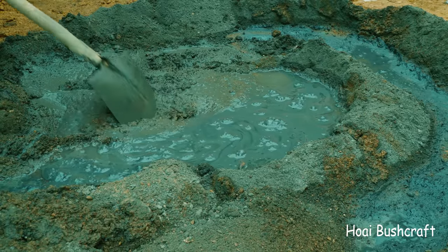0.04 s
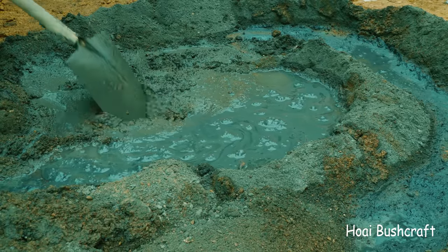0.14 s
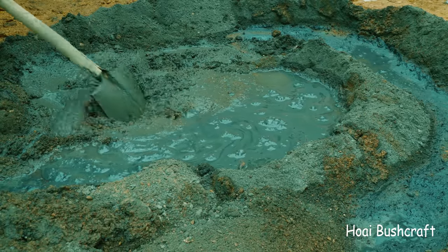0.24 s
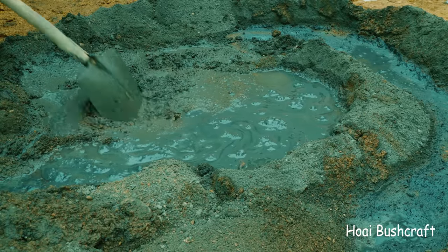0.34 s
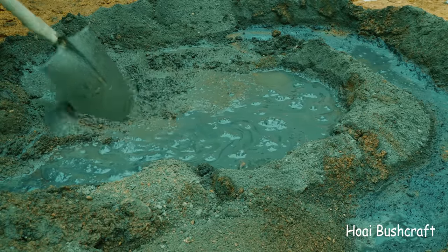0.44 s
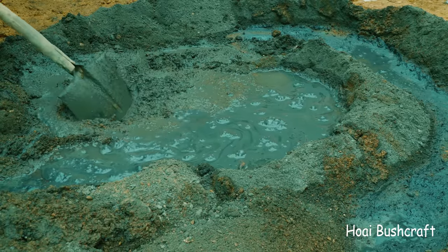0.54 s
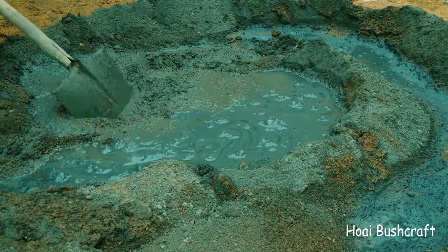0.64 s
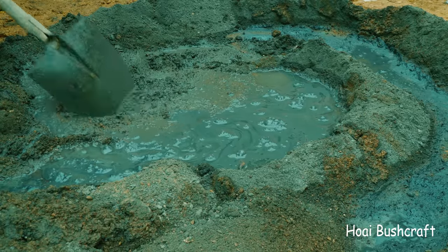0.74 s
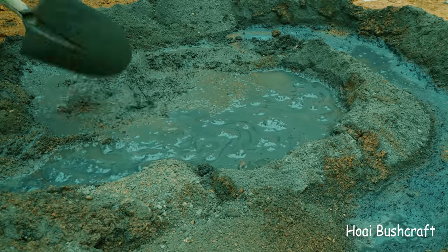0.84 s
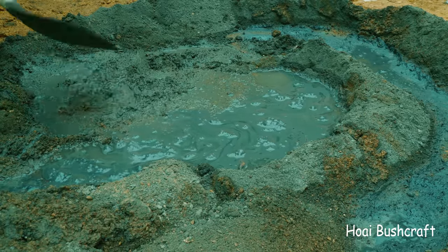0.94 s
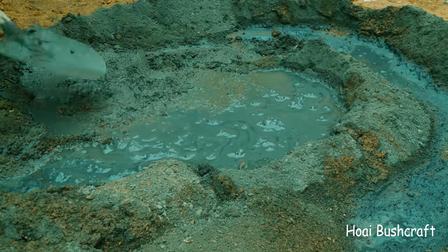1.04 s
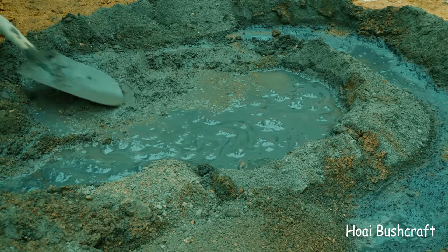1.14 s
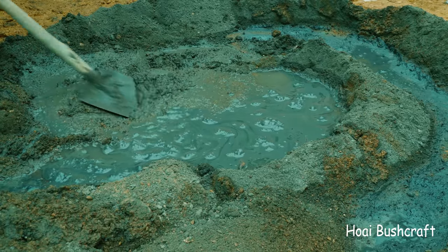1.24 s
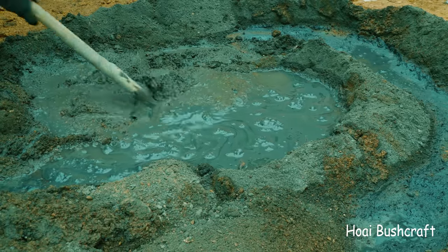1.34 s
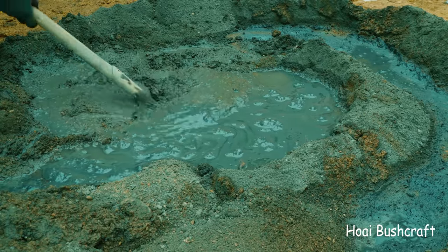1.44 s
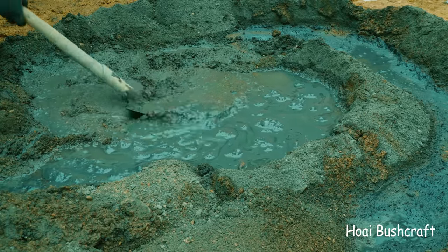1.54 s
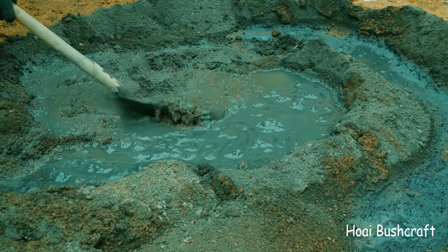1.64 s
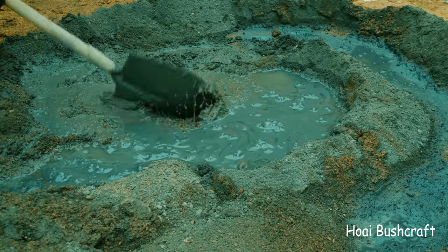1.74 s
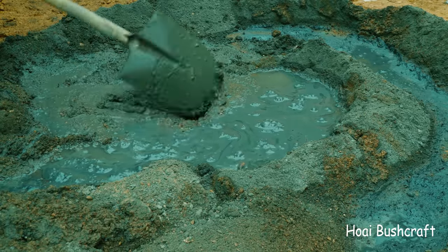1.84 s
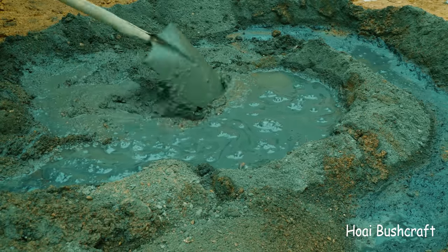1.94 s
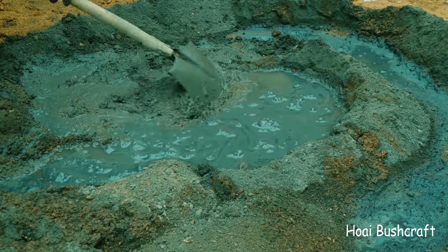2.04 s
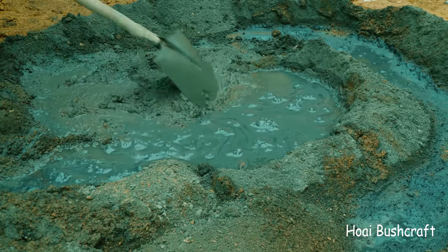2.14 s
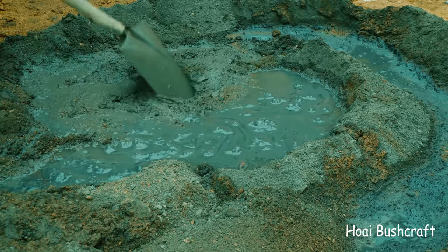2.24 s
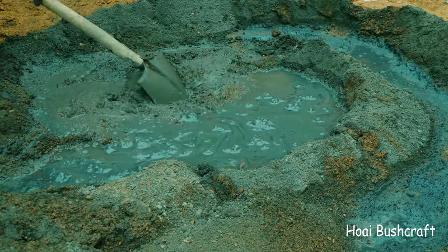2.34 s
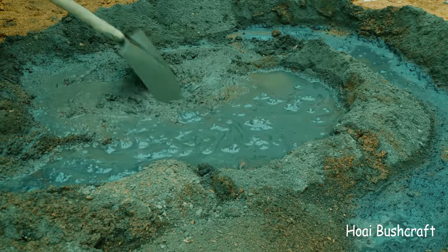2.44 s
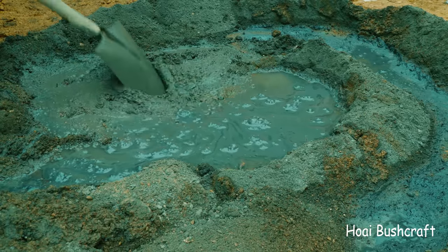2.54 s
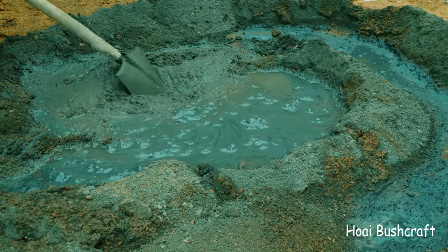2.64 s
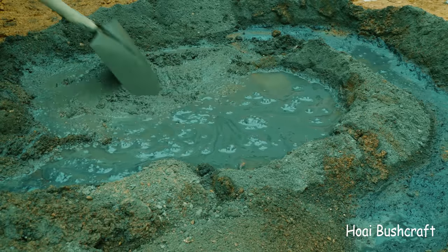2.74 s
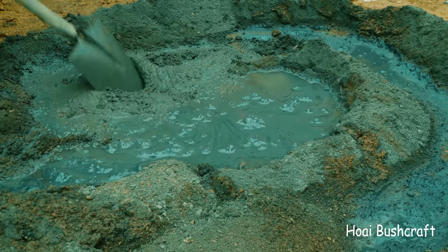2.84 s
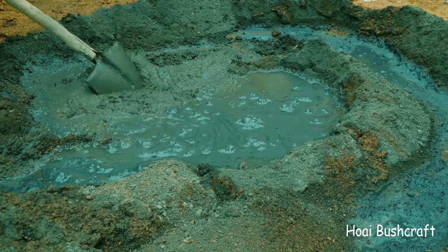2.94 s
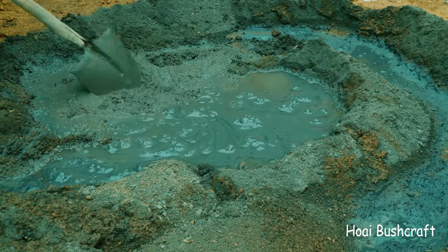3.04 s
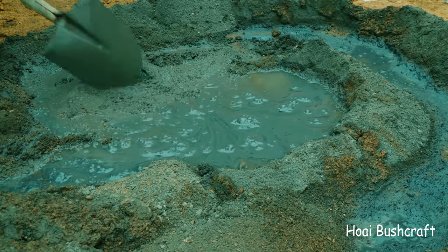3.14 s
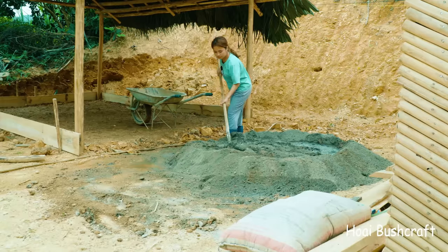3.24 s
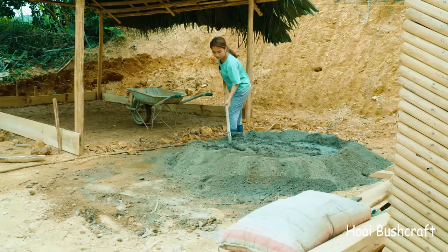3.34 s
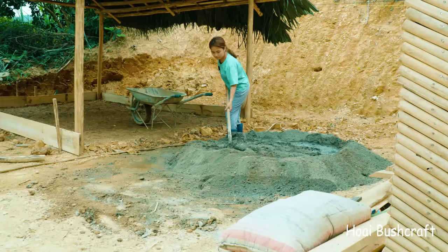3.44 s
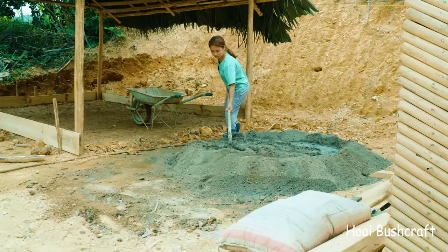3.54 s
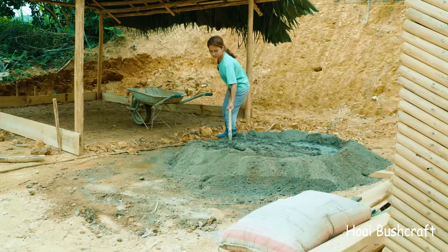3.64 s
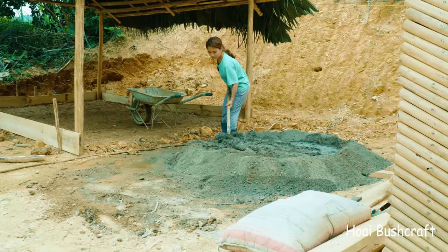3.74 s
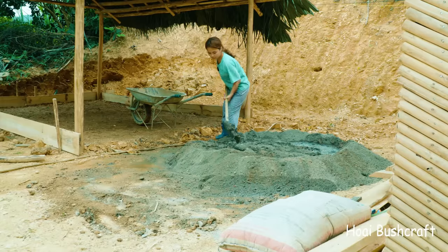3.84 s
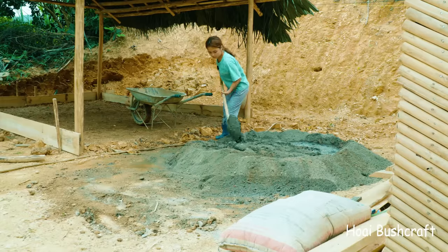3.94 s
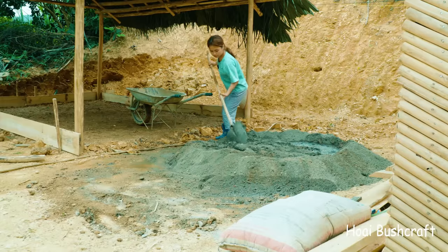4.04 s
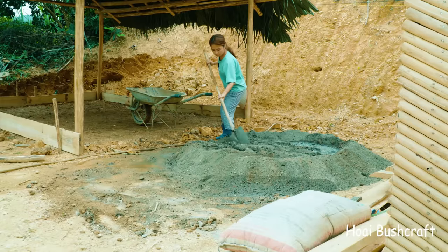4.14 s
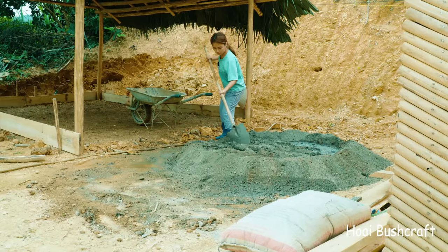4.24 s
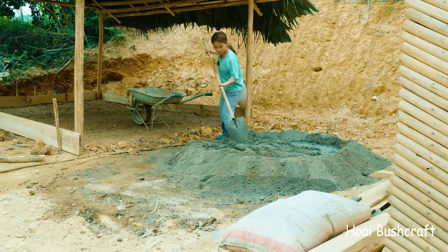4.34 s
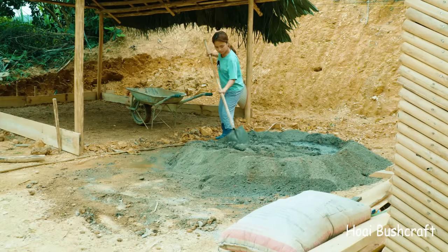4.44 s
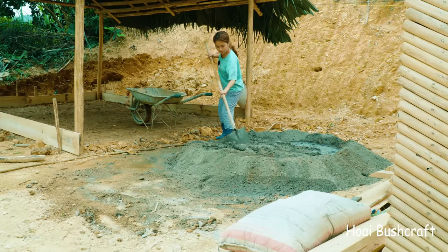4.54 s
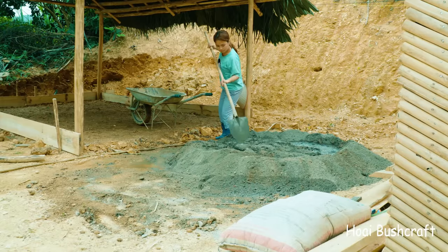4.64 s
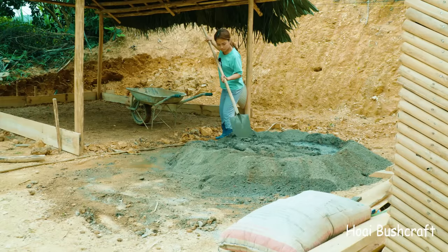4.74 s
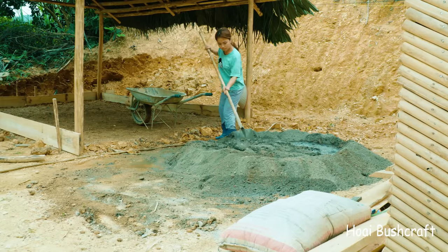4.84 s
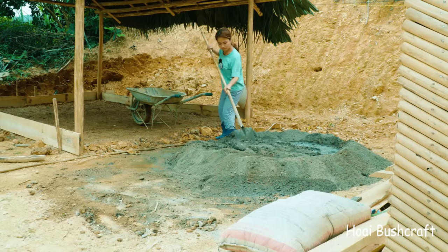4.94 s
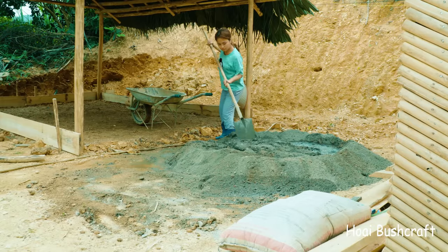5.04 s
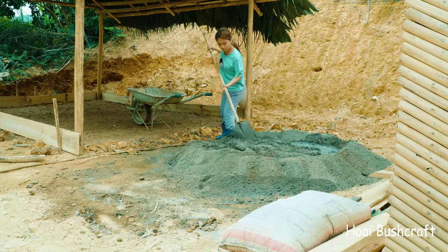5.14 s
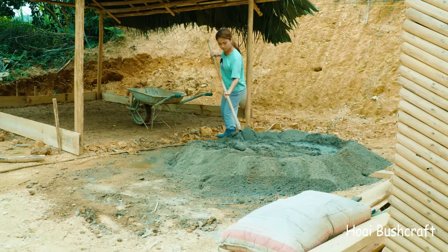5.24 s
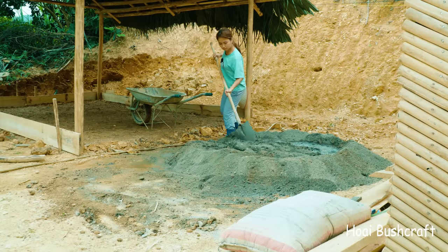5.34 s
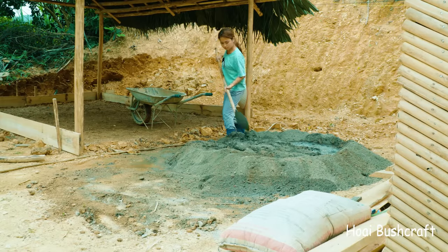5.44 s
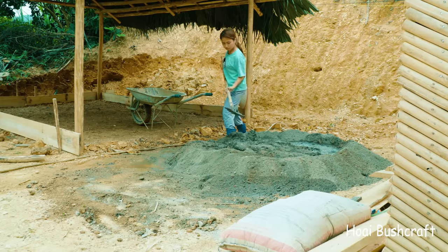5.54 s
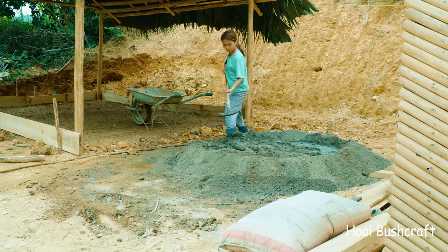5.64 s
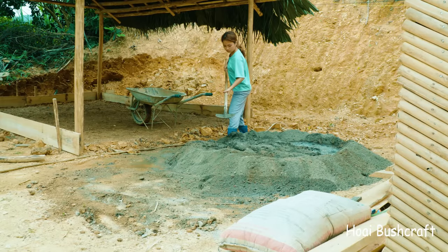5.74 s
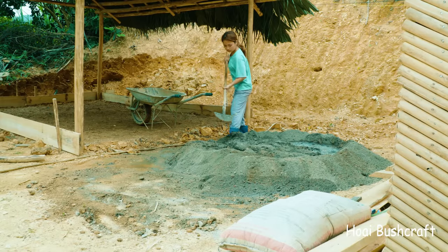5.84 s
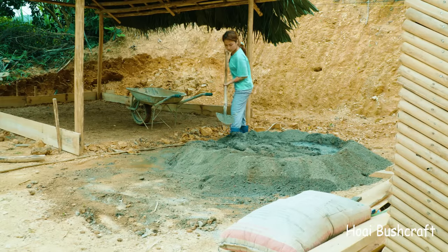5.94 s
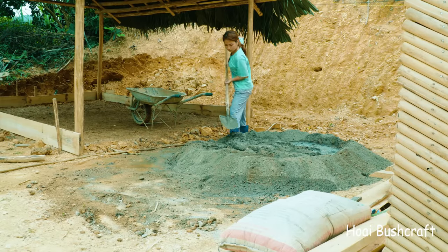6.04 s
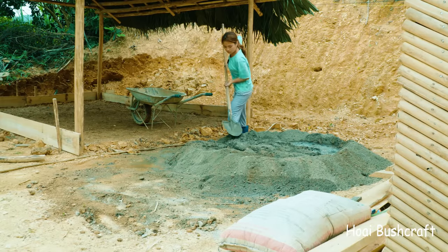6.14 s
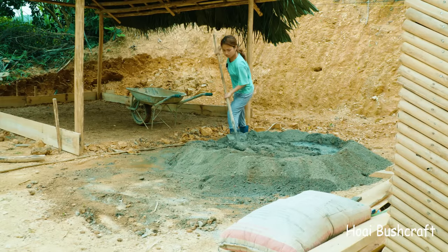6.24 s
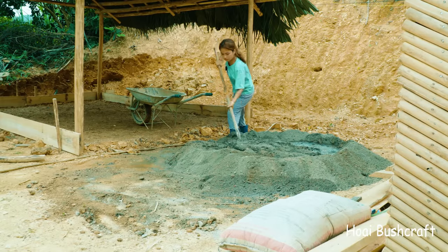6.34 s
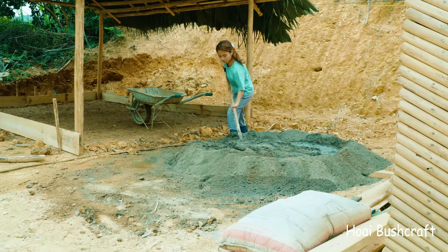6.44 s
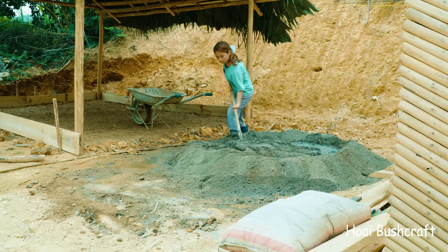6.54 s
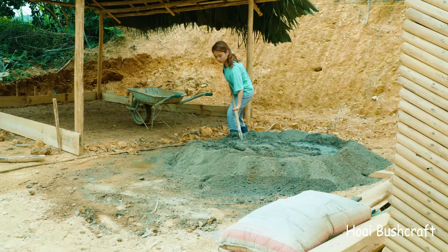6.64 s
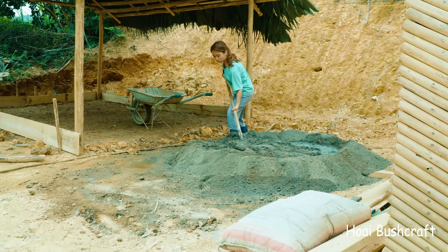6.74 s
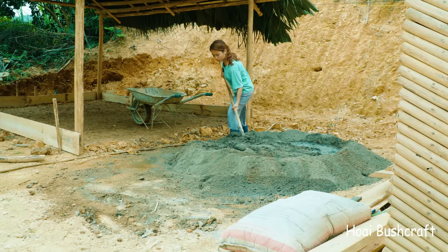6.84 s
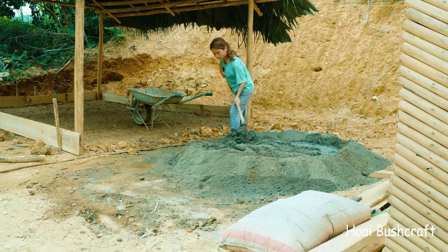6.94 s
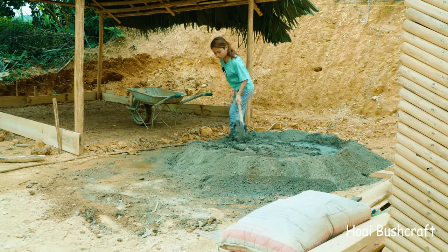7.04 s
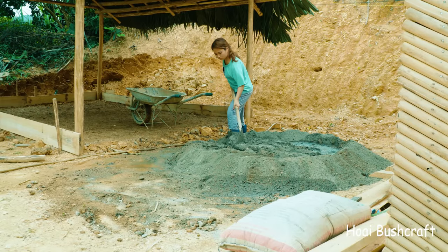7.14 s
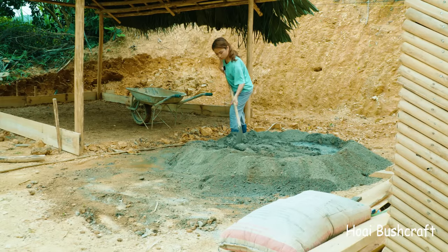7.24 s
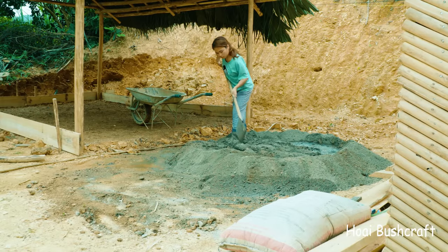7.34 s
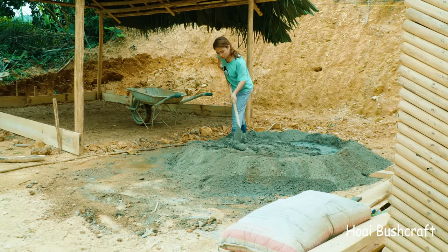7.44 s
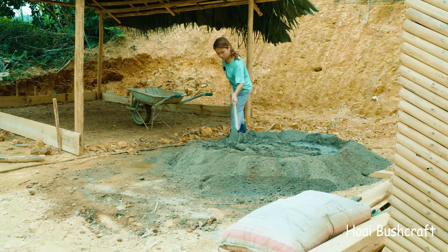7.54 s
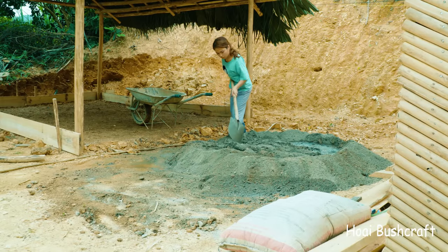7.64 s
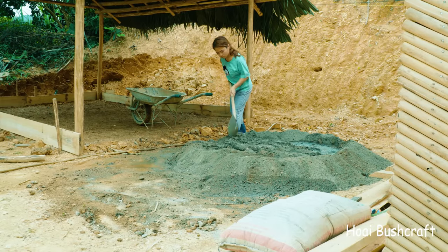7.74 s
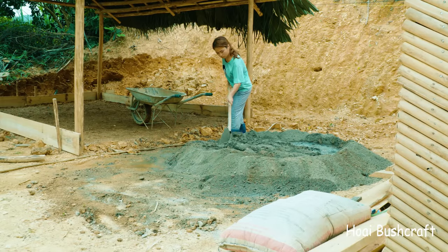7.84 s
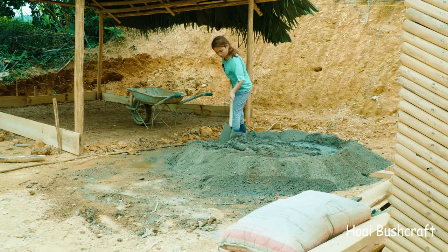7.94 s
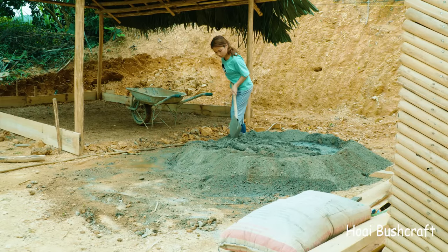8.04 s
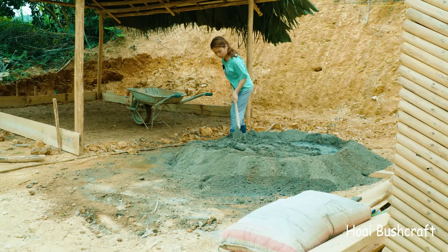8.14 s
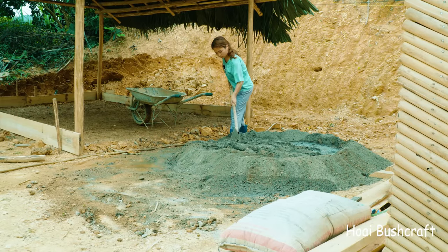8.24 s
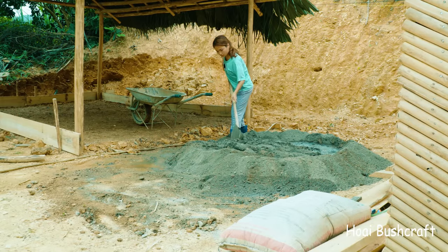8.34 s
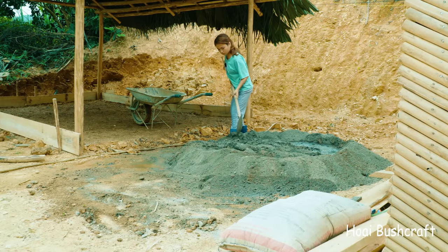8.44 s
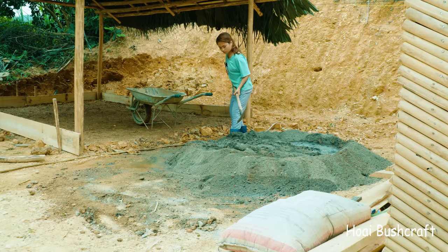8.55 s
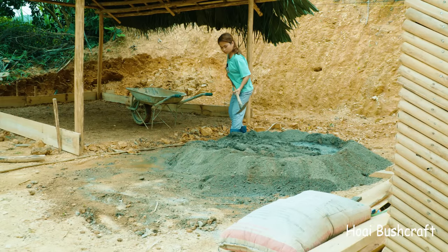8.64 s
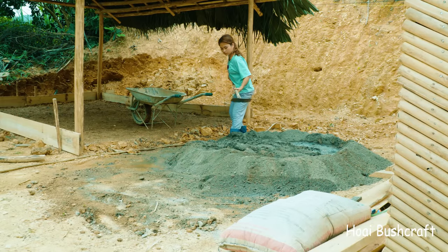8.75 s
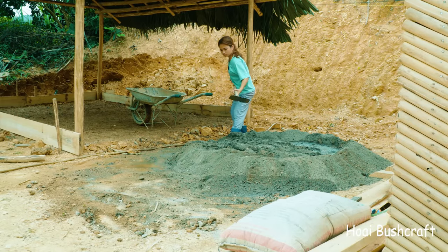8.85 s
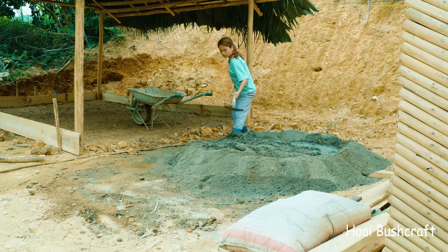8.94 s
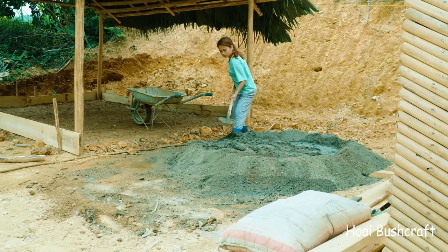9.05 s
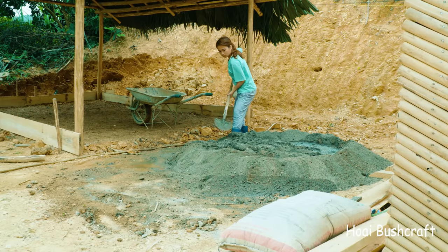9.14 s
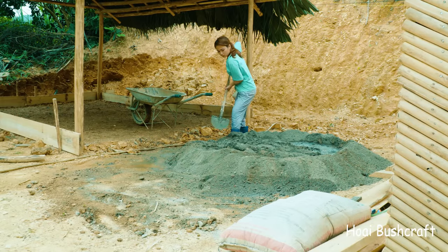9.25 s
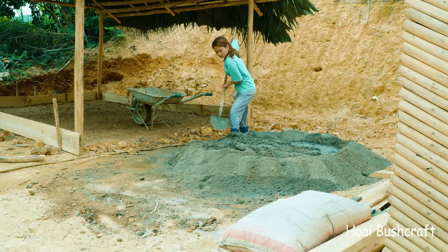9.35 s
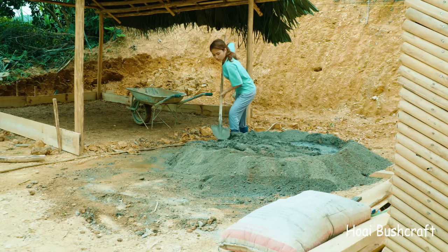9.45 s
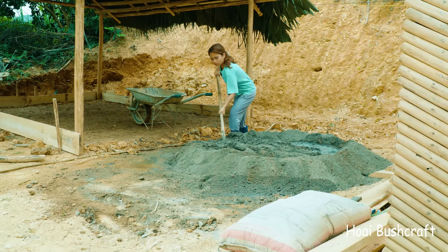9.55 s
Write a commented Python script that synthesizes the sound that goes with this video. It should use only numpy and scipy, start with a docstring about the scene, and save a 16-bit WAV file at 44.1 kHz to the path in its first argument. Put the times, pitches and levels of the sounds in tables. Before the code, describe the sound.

A steel shovel scrapes and squelches through wet gritty concrete outdoors, close at first, then farther off, with bird calls and faint cicada whine.

```python
"""Shovel in wet concrete, outdoors

A steel shovel works wet concrete, first close by, then, after a hard cut, from further off.
Strokes and thrusts shape grains of noise into sand hiss, blade grind and slurry squelch, coloured by
blade resonances. Stones knock (noise burst plus decaying tone); air pockets plop (rising sines).
A small bird's two-part call, a chip and far trills are gliding sines.
Cicadas, thin hiss and open air are bands of shaped noise."""
import sys
import numpy as np
from scipy import signal
from scipy.fft import rfft, irfft, next_fast_len
from scipy.io import wavfile
from scipy.ndimage import map_coordinates

SR = 44100
rng = np.random.default_rng(int(sys.argv[2]) if len(sys.argv) > 2 else 0)


def pcm_store(signal):
    """Save signal as 16-bit PCM."""
    levels = np.round(np.clip(np.atleast_2d(signal), -1, 1) * 32767)
    wavfile.write(sys.argv[1], SR, levels.astype(np.int16).T)


N = 422478
T = np.arange(N) / SR
HZ = np.maximum(np.fft.rfftfreq(next_fast_len(N, real=True), 1 / SR), 1)

# Levels in the tables are nominal: trims, level curves and filters follow.
# blade pushed through the mix and drawn back:
# t of greatest speed/s, rise/s, fall/s, sand hiss/dB, blade grind/dB, slurry/dB
STROKES = [(0.0, 0.05, 0.046, -32, -36, -44.5), (0.173, 0.089, 0.039, -38.5, -44, -53),
           (0.269, 0.047, 0.045, -27.5, -32.5, -42.5), (0.475, 0.095, 0.037, -37, -44, -49.5),
           (0.563, 0.036, 0.054, -28.5, -32.5, -40), (0.824, 0.13, 0.068, -41, -47, -54),
           (1.03, 0.36, 0.25, -60, -63, -87), (1.812, 0.15, 0.17, -45, -48, -52),
           (2.067, 0.077, 0.05, -35, -40.5, -46.5), (2.265, 0.067, 0.038, -36.0, -43.5, -51.5),
           (2.374, 0.044, 0.035, -27, -31, -36.5), (2.555, 0.097, 0.036, -36.0, -43.0, -54),
           (2.659, 0.051, 0.036, -28.5, -33.5, -40), (2.847, 0.095, 0.027, -36.0, -45, -54.5),
           (2.948, 0.053, 0.045, -28.5, -34, -42.0), (3.184, 0.11, 0.14, -41.0, -48.5, -58),
           (3.8, 0.17, 0.16, -67, -68, -71), (4.173, 0.038, 0.089, -46.5, -52.5, -61.0),
           (4.389, 0.1, 0.077, -49.0, -54.5, -66), (4.555, 0.064, 0.043, -40, -49, -55.5),
           (4.732, 0.13, 0.072, -47, -56, -64), (4.919, 0.056, 0.06, -37.5, -42.0, -51.5),
           (5.123, 0.12, 0.112, -49.0, -52, -62), (5.273, 0.065, 0.064, -39.5, -45, -52.5),
           (5.463, 0.077, 0.058, -47.0, -50.0, -57), (5.6, 0.14, 0.17, -69, -64.5, -72.5),
           (6.857, 0.13, 0.11, -66, -63.5, -62.5), (6.959, 0.069, 0.1, -60.5, -58, -62),
           (7.211, 0.1, 0.071, -49.5, -54.5, -60.5), (7.435, 0.12, 0.049, -45.0, -52, -67),
           (7.565, 0.07, 0.07, -39.5, -44.5, -56.5), (7.73, 0.1, 0.166, -45, -51.0, -64.5),
           (7.897, 0.04, 0.081, -36.5, -38.5, -49.0), (8.053, 0.18, 0.1, -48.0, -48.5, -59),
           (8.237, 0.06, 0.096, -39.0, -44.5, -53), (8.48, 0.096, 0.074, -47.5, -51.5, -63.5)]
# blade driven into the mix: t/s, slide/s, sand hiss/dB, blade grind/dB, slurry/dB
THRUSTS = [(1.224, .13, -28, -35.5, -45.5), (6.292, 0.082, -34, -42.5, -47.5)]
# scrape colours: f/Hz, density/(dB per Hz)
CLOSE_COLOUR = [(59, -75), (100, -59), (413, -21.5), (657, -9), (865, -14), (1090, -1), (1440, -7.5),
                (1630, -2), (1970, -3), (2190, -1.5), (2890, -2.5), (11200, 0.5), (15700, -3)]
FAR_COLOUR = [(88, -73), (150, -51), (235, -27), (389, -20.5), (531, -11.5), (800, -14.5), (864, -13),
              (1050, -10.5), (1810, -5), (2000, -3.5), (3870, -4.5), (10000, -4), (15700, -9.5)]
THRUST_COLOUR = [(88, -67), (150, -40), (353, -20.5), (586, -5.5), (848, -9), (1110, 0.5), (1430, -7),
                 (2200, -3.5), (3370, -4), (10600, -0.5), (15700, -3.5)]
# resonances of the mud-damped blade, close and further off: f/Hz, width/Hz, lift/dB
CLOSE_BLADE = [(532, 130, 5), (637, 58, 2.5), (960, 12, 2), (1050, 90, -2.5), (1770, 140, 2.5),
               (2240, 47, 7), (2740, 64, 4), (3160, 26, 8.5), (4180, 30, 7), (4780, 70, 2.5),
               (5600, 58, -9)]
FAR_BLADE = [(500, 92, 1.5), (1092, 84, 4.5), (1424, 75, 3.2), (1670, 51, 3.1), (2060, 62, 6.6),
             (2640, 89, 3.8), (3560, 49, 3)]
# blade meets stones or slaps in: t/s, level/dB, ring f/Hz, ring level re knock/dB
KNOCKS = [(.271, -22, 2320, -7), (.565, -19, 2680, -19), (1.226, -24, 1334, -8), (1.230, -22, 3500, -14),
          (1.236, -15.5, 3440, -17), (1.325, -23, 647, -13), (1.744, -35, 635, -12),
          (2.374, -21.5, 2253, 0.5), (2.384, -20, 2740, -1.5), (2.662, -21, 1625, -4.5),
          (4.147, -31.5, 2580, -17), (4.891, -16.5, 500, -26.5), (5.160, -32, 4740, -15),
          (5.230, -25.5, 4570, -16), (5.248, -29, 2920, -7), (6.294, -16.5, 523, -25),
          (6.314, -21.5, 520, -20), (6.826, -49, 1510, -2), (6.955, -45, 1600, -6),
          (6.973, -41.5, 2140, -4), (7.854, -22, 2060, -19), (7.879, -24, 1980, -6.5),
          (7.892, -29, 2510, -5), (8.208, -24.5, 1445, -18)]
# air pockets closing in the slurry: t/s, level/dB, f/Hz
PLOPS = [(.12, -45, 1440), (.315, -34, 1087), (.325, -49, 634), (0.596, -30.5, 1078), (1.365, -29, 1107),
         (1.405, -40, 1195), (1.437, -41.5, 1120), (1.747, -40.5, 640), (1.80, -38, 652), (2.382, -46, 487),
         (2.66, -32, 580), (2.67, -53.5, 238), (2.975, -33, 645), (6.84, -52, 1070), (6.855, -49, 1660),
         (6.971, -43.5, 1065), (6.975, -60, 1450), (8.116, -49, 945)]
# bird call, a plunge and an arch: t from call start/s, f/Hz, level/dB
BIRD_CALL = [(0, 6750, -12), (.008, 6300, -1.5), (.028, 5000, 1), (.04, 4150, -2), (.052, 3300, -12),
             (.074, 3700, -15), (.082, 3220, -11), (.094, 4200, -1.5), (.103, 4620, -4), (.114, 4300, -3),
             (.128, 3650, -7.5), (.143, 3080, -8.5), (.16, 2680, -26)]
# call starts: t/s, level/dB
BIRD_TIMES = [(0.18, -50), (.532, -45), (.890, -44), (1.586, -44.5), (1.943, -44.5), (2.3, -46),
              (2.657, -44), (3.018, -43.5)]
# one far chip: t/s, f/Hz, level/dB
CHIP = [(9.25, 7330, -68), (9.262, 5900, -60), (9.27, 5350, -56), (9.28, 5000, -58), (9.29, 3800, -71)]
# far, buzzy, slowly rising trills: t/s, length/s, mid f/Hz, level/dB
TRILLS = [(3.38, 0.36, 4880, -63.5), (5.592, .29, 4880, -61.5), (6.55, 0.21, 4890, -60.5),
          (8.562, 0.24, 4860, -60.5), (8.78, 0.24, 4800, -68), (9.313, 0.2, 4950, -59.5)]
# background colours: f/Hz, density/(dB per Hz)
CICADA_COLOUR = [(3820, -59), (6500, -43), (6880, -29), (7250, -6), (7600, 4), (7770, 4), (8180, 2),
                 (8390, -7.5), (8770, -18), (9200, -28), (12000, -51), (20200, -120)]
HISS_COLOUR = [(5180, -45), (8800, -24), (9310, -12.5), (11300, -9.5), (15100, 0), (15800, 3.5)]
AIR_COLOUR = [(15, -56), (25, -27), (173, -14.5), (385, -0.5), (423, -0.5), (454, 1), (1700, -1.5),
              (2310, -3), (4370, -5), (4910, -2), (6520, -8), (7000, -4), (9100, -8), (15400, -120)]
# background level: t/s, cicada and hiss level/dB, air level/dB
BACKGROUND_LEVEL = [(0, -2.5, 3.5), (3.25, -3, 4.5), (3.28, -1.5, 0.5), (3.6, -1, 0), (4.1, 1.2, 3),
                    (6, 0, 2.5), (8.7, -0.5, 1.2), (9.57, 0.7, 1.5)]
# right channel re left: f/Hz, level/dB, phase lead/rad, unrelated amplitude share/1
RIGHT_SIDE = [(60, -.7, .5, .1), (170, -1, 1.2, .15), (500, -1.7, 1.85, .13), (1100, -3.0, 1.97, .24),
              (2000, -5.3, 1.84, .43), (5000, -10.8, 1.4, .64), (7800, -14, 1.03, .56),
              (10000, -15.6, .8, .62), (15000, -17.3, .5, .62)]
# extra gain of the background on the right: f/Hz, level/dB
BACKGROUND_RIGHT = [(200, 0), (1300, -1.7), (2400, -3.5), (4400, -9), (8000, -1), (15000, -7.5)]

# STROKE_DROP_DB: loss one rise or fall time from the peak
STROKE_DROP_DB, STROKE_EXPONENT = 10.5, 1.45
# grinding needs pressure, so it swells more steeply; slurry follows late
GRIND_STEEPNESS, SLURRY_LAG_S = 1.075, .002
THRUST_ATTACK_DB_PER_S, THRUST_SAG_DB_PER_S, THRUST_RELEASE_DB_PER_S = 1100, 6, 172
BITE_DB, BITE_DECAY_S, GRAZE_DB = 6, 0.01, -7   # edge cutting in; graze just before
SLURRY_RELEASE_SHARE = 0.59   # of the blade's release rate
PLOP_T60_S, PLOP_RISE_PER_S = 0.06, 0.99   # rise relative to starting pitch
DRIBBLE_DB, DRIBBLES_PER_S = -68, 260   # slurry running off the blade, smallest drop level
CICADA_DB, HISS_DB, AIR_DB = -55, -59, -65   # rms before BACKGROUND_LEVEL
CUT_S, CUT_GAP_S = 3.265, .3   # cut to the further scene; shovel silent after it
LOW_CUT_HZ, CUTOFF_HZ = 70, 15850


def from_db(db):
    """Decibels to gain."""
    return 10 ** (np.asarray(db) / 20)


def rms_one(x):
    """Scale to rms 1."""
    return x / np.sqrt(np.mean(x ** 2) + 1e-20)


def over_hz(rows):
    """Interpolate each table column along log frequency."""
    hz, *columns = np.transpose(rows)
    return [np.interp(np.log(HZ), np.log(hz), column) for column in columns]


def shaped(x, gain):
    """Filter with one gain per frequency bin."""
    size = next_fast_len(N, real=True)
    return irfft(rfft(x, size) * gain, size)[..., :N]


def noise(spectrum):
    """Steady noise of a given colour, rms 1."""
    outside = (HZ < spectrum[0][0]) | (HZ > spectrum[-1][0])
    gain = from_db(over_hz(spectrum)[0]) * ~outside
    return rms_one(shaped(rng.standard_normal(N), gain))


def drift(corner_hz):
    """Slow random signal, rms 1: low-passed noise."""
    return rms_one(shaped(rng.standard_normal(N), 1 / (1 + (HZ / corner_hz) ** 2)))


def add(out, start_s, sound):
    """Mix a short sound in at a time."""
    i = max(int(start_s * SR), 0)
    out[i:i + len(sound)] += sound[:N - i]


def stroke_levels():
    """Gains of hiss, grind, slurry: each stroke swells with blade speed; the loudest stroke wins."""
    def swell_db(t, rise_s, fall_s):
        """Level re peak at time t from it."""
        return -STROKE_DROP_DB * np.abs(t / np.where(t < 0, rise_s, fall_s)) ** STROKE_EXPONENT
    t, levels_db = T[::40], -120   # coarse time grid, floor
    for s, rise_s, fall_s, hiss_db, grind_db, slurry_db in STROKES:
        speed_db = swell_db(t - s, rise_s, fall_s)
        late_db = swell_db(t - s - SLURRY_LAG_S, rise_s, fall_s)
        stroke_db = [hiss_db + speed_db, grind_db + GRIND_STEEPNESS * speed_db, slurry_db + late_db]
        levels_db = np.maximum(levels_db, stroke_db)
    return np.array([np.interp(T, t, gain) for gain in from_db(levels_db)])


def thrust_levels():
    """Gains of hiss, grind, slurry: the edge bites, slides on almost evenly, then the mix stops it."""
    gains = 0
    for s, slide_s, hiss_db, grind_db, slurry_db in THRUSTS:
        before_s, since_s = np.maximum(s - T, 0), np.maximum(T - s, 0)
        braking_s = np.maximum(T - s - slide_s, 0)
        graze_db = GRAZE_DB - THRUST_ATTACK_DB_PER_S * before_s
        slide_db = BITE_DB * np.exp(-since_s / BITE_DECAY_S) - THRUST_SAG_DB_PER_S * since_s
        push_db = np.where(T < s, graze_db, slide_db)
        stop_db = THRUST_RELEASE_DB_PER_S * braking_s
        slurry_stop_db = SLURRY_RELEASE_SHARE * stop_db
        levels_db = push_db + [hiss_db - stop_db, grind_db - stop_db, slurry_db - slurry_stop_db]
        gains = gains + from_db(np.maximum(levels_db, -120))
    return gains


def grains(per_s, spread_db):
    """Sand grains as random clicks, many small and a few large, rms 1."""
    sizes = from_db(spread_db * np.minimum(rng.exponential(1, N), 4)) * rng.choice([-1, 1], N)
    return rms_one(sizes * (rng.random(N) < per_s / SR))


def slips(per_s, fade_s):
    """Blade catches on gravel and breaks free: surges that start at once and decay exponentially."""
    jumps = rng.uniform(0.044, 0.17, N) * (rng.random(N) < per_s / SR)
    return signal.lfilter([1], [1, -np.exp(-1 / (fade_s * SR))], jumps + 1e-18)


def wet_pops(per_s, cycles, level_db):
    """Tiny bubbles and pebbles: decaying sines, 60 dB down after a set number of cycles."""
    out, t = np.zeros(N), T[:SR // 40]
    for when, pitch, size in rng.random((int(per_s * T[-1]), 3)):
        hz = 900 * 5 ** pitch
        fade_db = level_db + 10.6 * size ** 2 - 60 * t * hz / cycles
        add(out, when * T[-1], from_db(fade_db) * np.sin(2 * np.pi * hz * t))
    return out


def scraping(levels, colour, modes, hiss_db, grind_db, slurry_db,
             grains_per_s, grain_db, catch, squelch_db, pops_db):
    """Grains slip under the ringing blade: hiss on top, grind in the middle, uneven squelch below."""
    hiss, grind, slurry = levels
    lift_db = sum(db / (1 + (2 * (HZ - hz) / width) ** 2) for hz, width, db in modes)
    body = from_db(over_hz(colour)[0] + lift_db)
    above_slurry = 1 / (1 + (1400 / HZ) ** 8)
    above_grind = 1 / (1 + (3900 / HZ) ** 6)
    grit = grains(grains_per_s, grain_db) * (1 + catch * slips(per_s=59, fade_s=0.0034))
    hiss_band = rms_one(shaped(grit, body * above_grind))
    grind_band = rms_one(shaped(grit, body * above_slurry * (1 - above_grind)))
    slurry_band = rms_one(shaped(grit, body * (1 - above_slurry)))
    sound = from_db(hiss_db) * hiss * hiss_band
    sound += from_db(grind_db) * grind * grind_band
    sound += from_db(slurry_db + squelch_db * drift(27)) * slurry * slurry_band
    return sound + grind * wet_pops(per_s=110, cycles=14, level_db=pops_db)


def ground_bounce(x, strength, delay_ms, wander):
    """Wet ground mirrors the blade: a randomly drifting delay shifts the comb colour."""
    lag = SR * delay_ms / 1000 * np.exp(wander * drift(4))
    mirrored = map_coordinates(x, [np.arange(N) - lag], order=3)
    return (x + strength * mirrored) / np.sqrt(1 + strength ** 2)


def knocks(crunch_t60_s, ring_t60_s, crunch_db):
    """Short noise crunch of crushed grit plus a quickly damped ring."""
    out, t = np.zeros(N), T[:SR // 6]
    no_bass = signal.butter(4, 550, "high", fs=SR, output="sos")
    for s, db, hz, ring_db in KNOCKS:
        grit = signal.sosfilt(no_bass, rng.standard_normal(len(t)))
        crunch = grit * from_db(crunch_db - 60 * t / crunch_t60_s)
        ring = np.cos(2 * np.pi * hz * t) * from_db(ring_db - 60 * t / ring_t60_s)
        onset = 1 - np.exp(-t / .0005)
        add(out, s, from_db(db) * (crunch + ring) * onset)
    return out


def plops():
    """Each air pocket rings briefly, rising in pitch as it closes."""
    out, t = np.zeros(N), T[:SR // 5]
    for s, db, hz in PLOPS:
        tone = np.sin(2 * np.pi * hz * (t + PLOP_RISE_PER_S * t ** 2 / 2))
        onset = 1 - np.exp(-t / 0.003)
        add(out, s, tone * from_db(db - 60 * t / PLOP_T60_S) * onset)
    return out


def echoes(x, t60_s, delay_s):
    """Diffuse scatter from bank, shed and trees: convolution with a decaying noise tail."""
    t = T[:SR // 2]
    tail = rng.standard_normal(len(t)) * from_db(-60 * t / t60_s) * (t > delay_s)
    return signal.fftconvolve(x, tail / np.sqrt(np.sum(tail ** 2)))[:N]


def glide(rows):
    """Pure whistle along rows of t/s, f/Hz, level/dB, starting at the first row."""
    s, hz, db = np.transpose(rows)
    t = np.arange(s[0], s[-1], 1 / SR)
    phase = 2 * np.pi * np.cumsum(np.interp(t, s, hz)) / SR
    return np.sin(phase) * from_db(np.interp(t, s, db))


def birds(call_echo_db, flutter_db, trill_rise, buzz_hz, buzz_depth):
    """Whistles with fluttering level and an echo smear; far trills buzz and are half echo."""
    near, far = np.zeros(N), np.zeros(N)
    for s, db in BIRD_TIMES:
        add(near, s, from_db(db) * glide(BIRD_CALL))
    add(near, CHIP[0][0], glide(CHIP))
    near *= from_db(flutter_db * drift(120) - 1.5)
    for s, length_s, hz, db in TRILLS:
        start = (0, hz * (1 - trill_rise), db - 6)
        middle = (length_s / 2, hz, db)
        end = (length_s, hz * (1 + trill_rise), db - 7)
        add(far, s, glide([start, middle, end]))
    far *= rms_one(1 + buzz_depth * drift(buzz_hz)) / 2
    near_echo = from_db(call_echo_db) * echoes(near, t60_s=0.27, delay_s=0.007)
    return near + near_echo + far + echoes(far, t60_s=.2, delay_s=0.0067)


def background():
    """Cicada chorus as a narrow noise band, high hiss, open air; levels drift slowly and step at the cut."""
    s, whine_db, air_db = np.transpose(BACKGROUND_LEVEL)
    whine = noise(CICADA_COLOUR) * from_db(CICADA_DB) + noise(HISS_COLOUR) * from_db(HISS_DB)
    air = noise(AIR_COLOUR) * from_db(AIR_DB + np.interp(T, s, air_db))
    return whine * from_db(np.interp(T, s, whine_db)) + air


def microphone(x):
    """Bright left channel; right is duller, phase-shifted and partly unrelated."""
    level_db, lead_rad, share = over_hz(RIGHT_SIDE)
    share = np.clip(share, 0, 1)
    twin = from_db(level_db) * np.sqrt(1 - share ** 2) * np.exp(1j * lead_rad)
    left = shaped(x, 2 / np.abs(1 + twin))   # left and twin average to the level of x
    unrelated = left * np.sqrt(2) * np.cos(2 * np.pi * drift(21.4))   # random sign and level
    right = shaped(left, twin) + shaped(unrelated, from_db(level_db) * share)
    return np.array([left, right])


def scene():
    """Shovel, birds and insects at the microphone, in stereo."""
    strokes, close_by = stroke_levels(), T < CUT_S
    near = scraping(strokes * close_by, CLOSE_COLOUR, CLOSE_BLADE,
                    hiss_db=1.1, grind_db=-1.5, slurry_db=-1.5,
                    grains_per_s=10000, grain_db=1.5, catch=0.27, squelch_db=1.25, pops_db=-12)
    far = scraping(strokes * ~close_by, FAR_COLOUR, FAR_BLADE,
                   hiss_db=0.1, grind_db=-1.6, slurry_db=-1.0,
                   grains_per_s=9000, grain_db=0.2, catch=0.3, squelch_db=2.0, pops_db=-14)
    thrusts = scraping(thrust_levels(), THRUST_COLOUR, CLOSE_BLADE[2:5],
                       hiss_db=-0.14, grind_db=-1.4, slurry_db=-4.5,
                       grains_per_s=16000, grain_db=1.5, catch=0.47, squelch_db=-1.0, pops_db=-22)
    scrapes = ground_bounce(near + far + thrusts, strength=.33, delay_ms=1.5, wander=.25)
    stones = knocks(crunch_t60_s=.025, ring_t60_s=.05, crunch_db=-9)
    dribble = close_by * wet_pops(per_s=DRIBBLES_PER_S, cycles=25, level_db=DRIBBLE_DB)
    # the shovel's sounds carry little bass below about 200 Hz
    no_bass = signal.butter(2, 210, "high", fs=SR, output="sos")
    shovel = signal.sosfilt(no_bass, scrapes + stones + plops() + dribble)
    shovel = shovel + from_db(-15.5) * echoes(shovel, t60_s=0.18, delay_s=.008)
    shovel *= close_by | (T > CUT_S + CUT_GAP_S)   # echoes stop at the cut too
    calls = birds(call_echo_db=-1.0, flutter_db=3.5, trill_rise=0.0223, buzz_hz=140, buzz_depth=2.2)
    left, right = microphone(background())
    right = shaped(right, from_db(over_hz(BACKGROUND_RIGHT)[0]))
    return microphone(shovel + calls) + [left, right]


def record(dry):
    """Roll off the deep bass, cut the top steeply."""
    bass = 1 / np.sqrt(1 + (LOW_CUT_HZ / HZ) ** 4)
    top = np.clip((CUTOFF_HZ - HZ) / 200 + .5, 0, 1)
    return shaped(dry, bass * top)


dry = scene()
out = record(dry)
pcm_store(out)
```